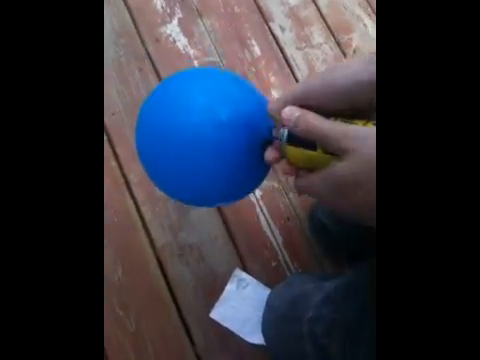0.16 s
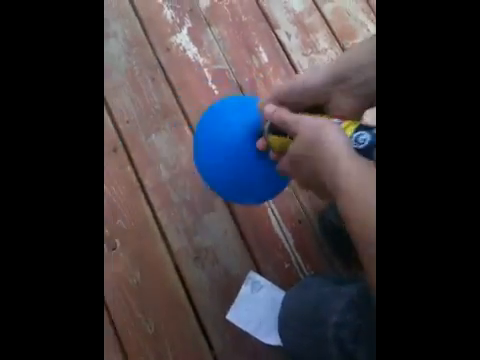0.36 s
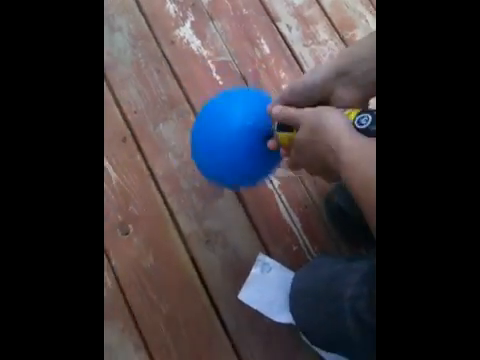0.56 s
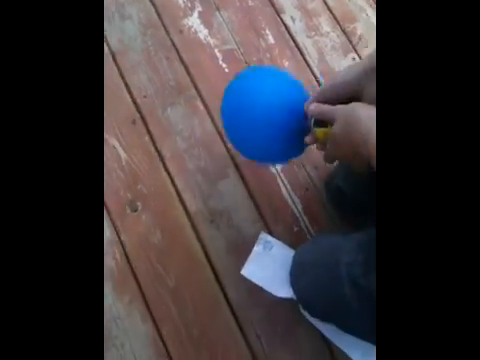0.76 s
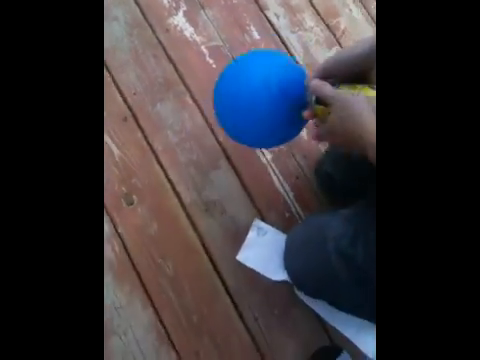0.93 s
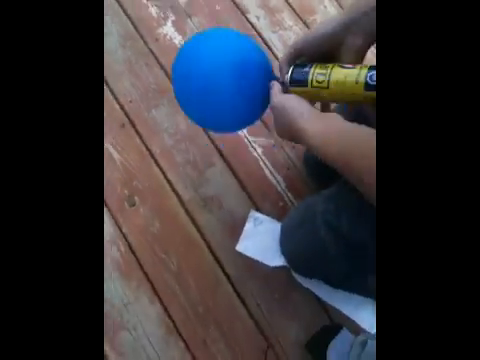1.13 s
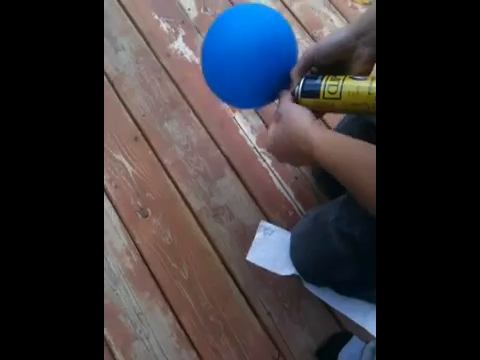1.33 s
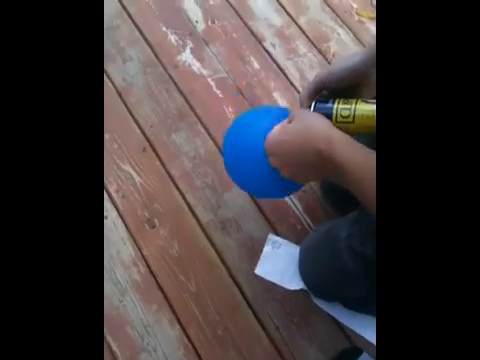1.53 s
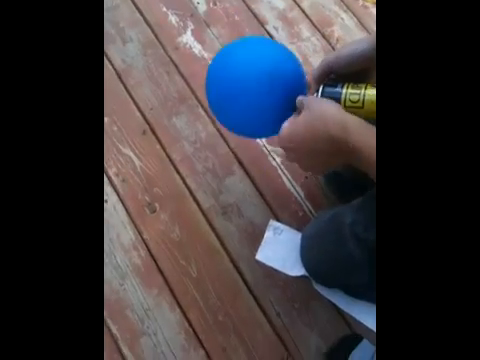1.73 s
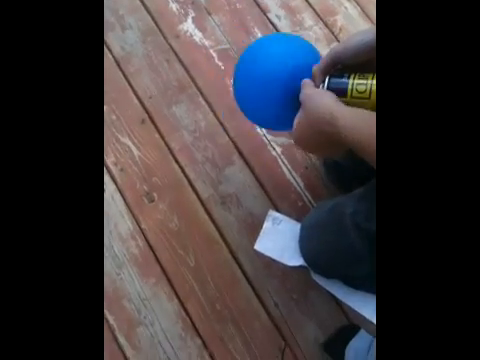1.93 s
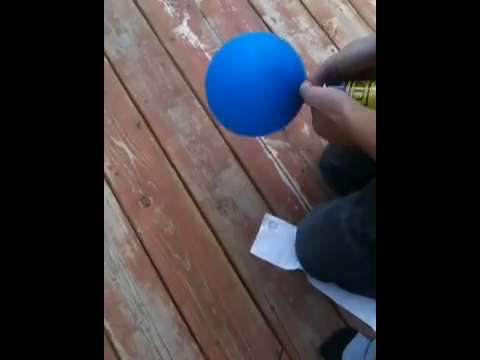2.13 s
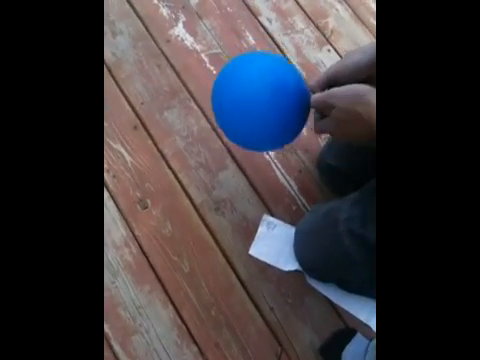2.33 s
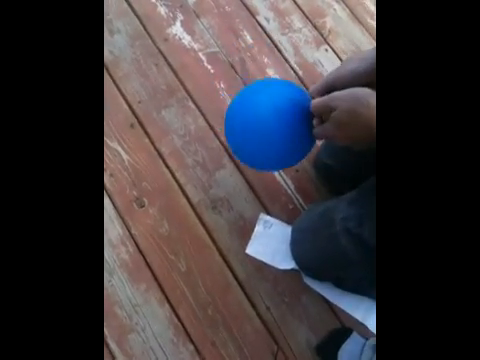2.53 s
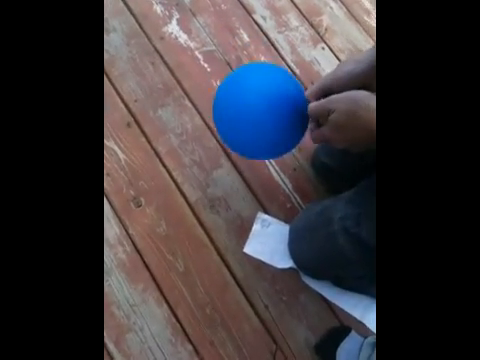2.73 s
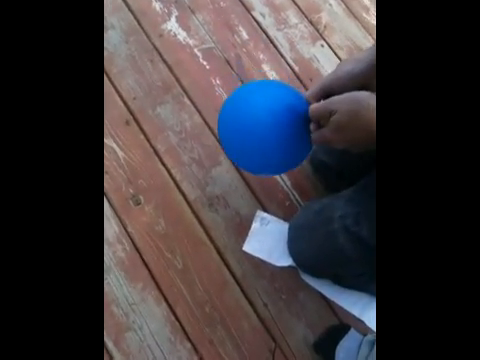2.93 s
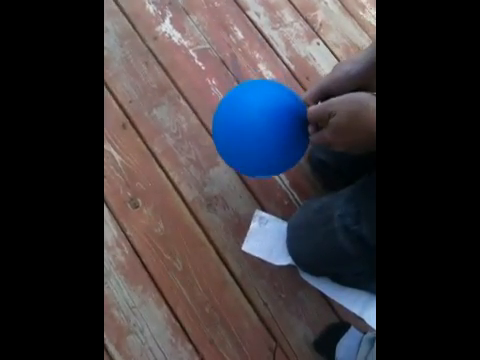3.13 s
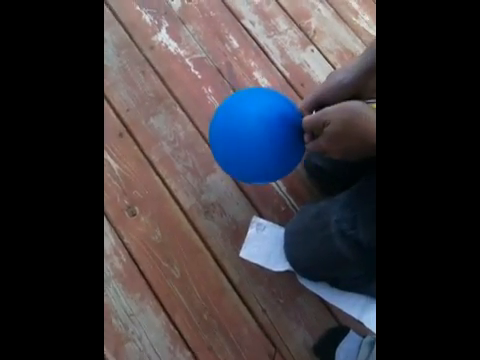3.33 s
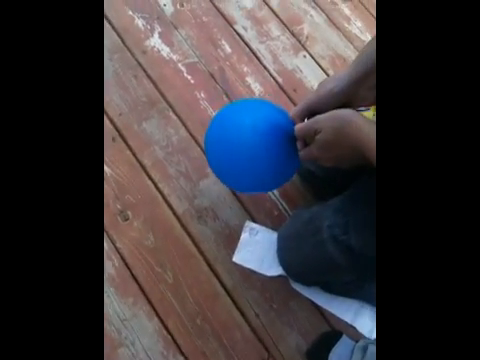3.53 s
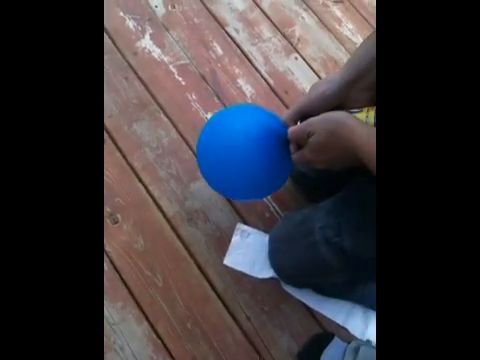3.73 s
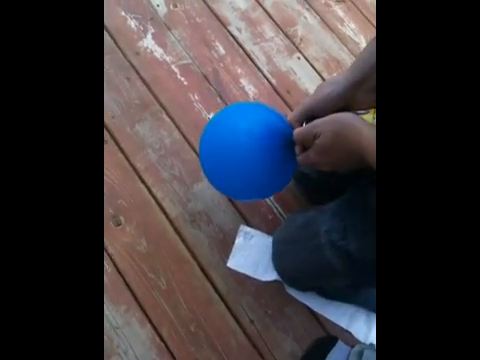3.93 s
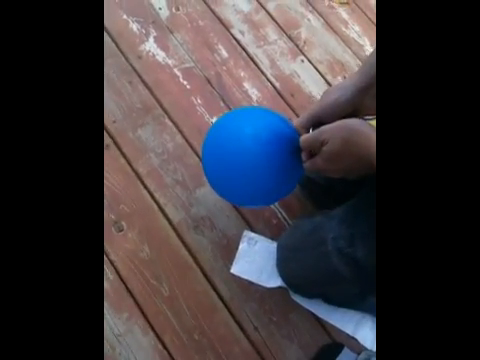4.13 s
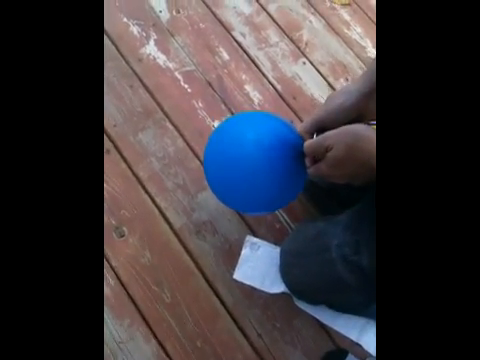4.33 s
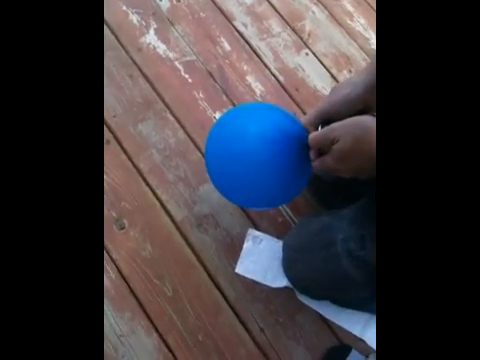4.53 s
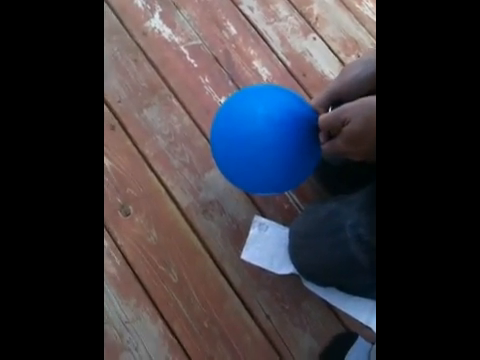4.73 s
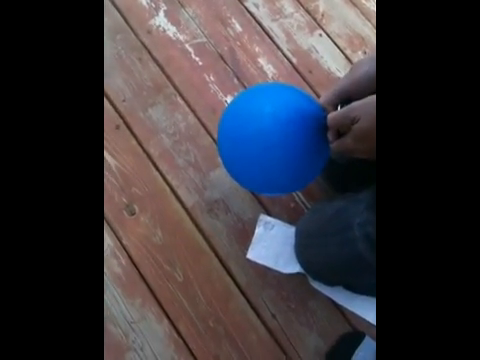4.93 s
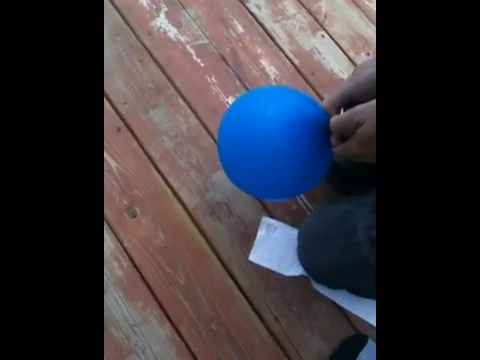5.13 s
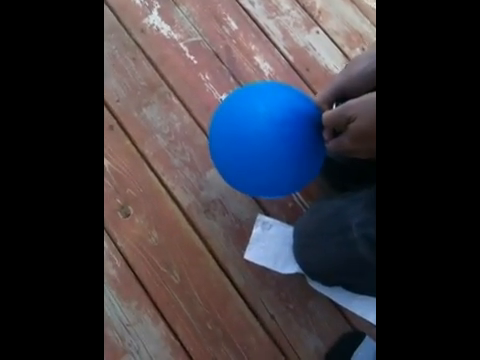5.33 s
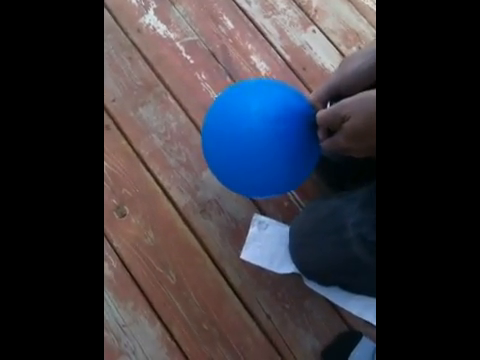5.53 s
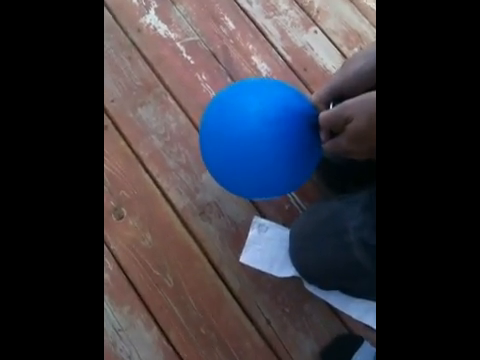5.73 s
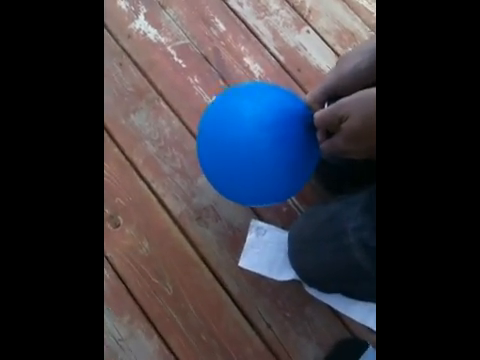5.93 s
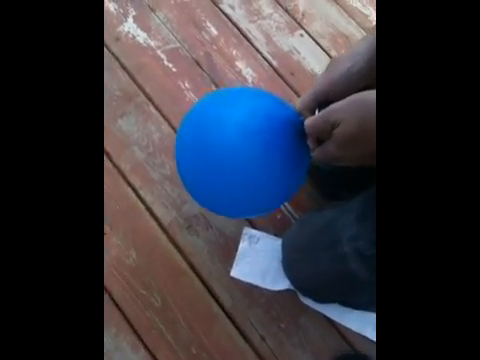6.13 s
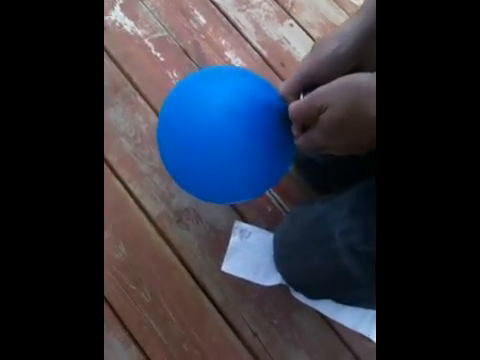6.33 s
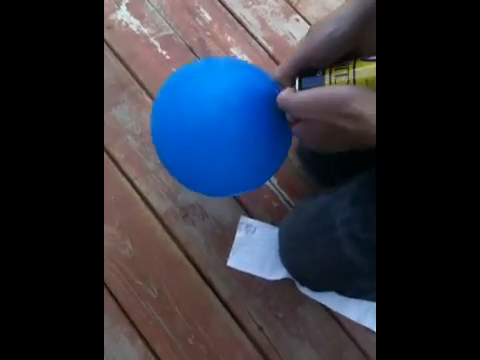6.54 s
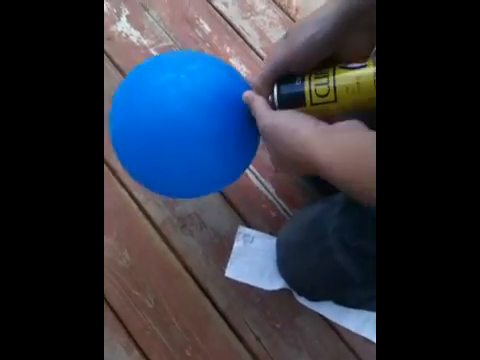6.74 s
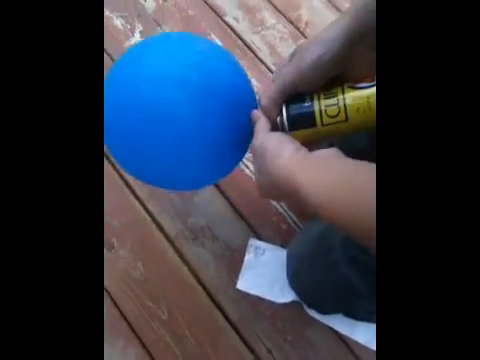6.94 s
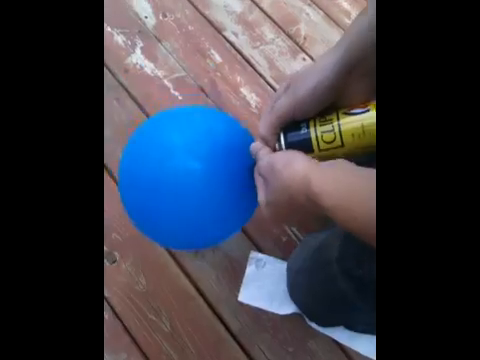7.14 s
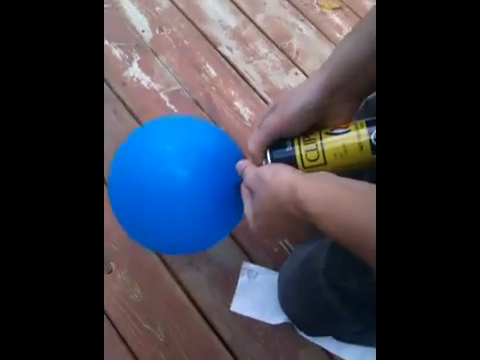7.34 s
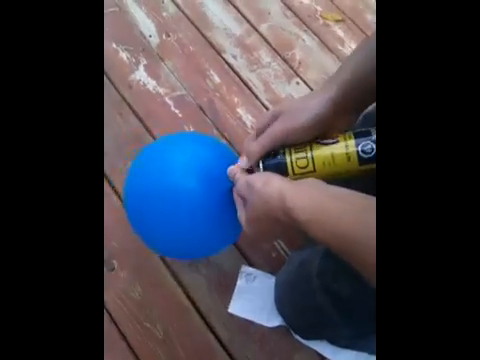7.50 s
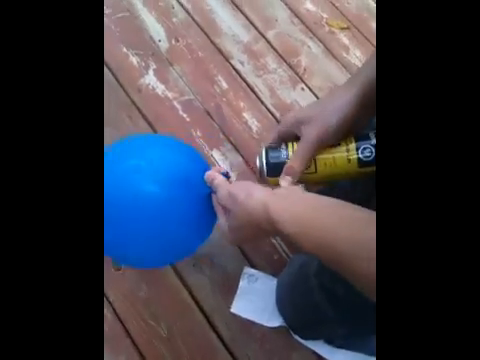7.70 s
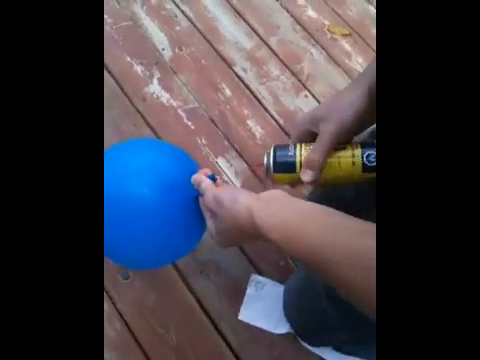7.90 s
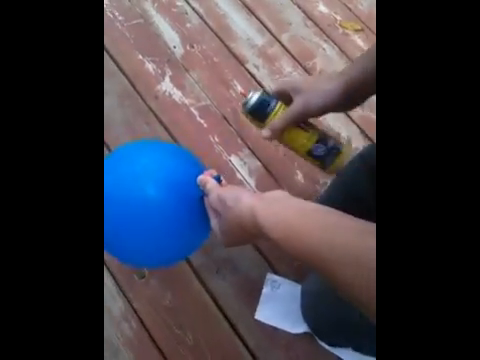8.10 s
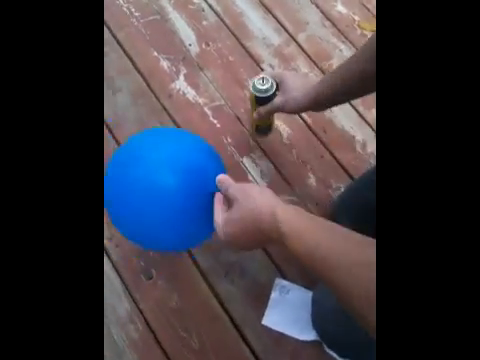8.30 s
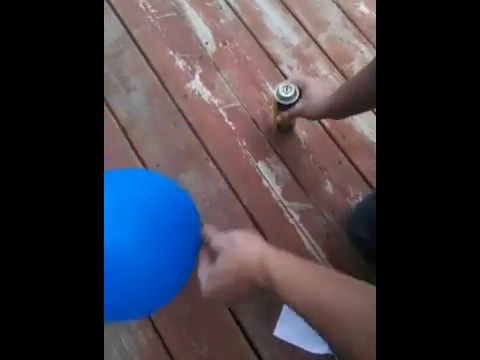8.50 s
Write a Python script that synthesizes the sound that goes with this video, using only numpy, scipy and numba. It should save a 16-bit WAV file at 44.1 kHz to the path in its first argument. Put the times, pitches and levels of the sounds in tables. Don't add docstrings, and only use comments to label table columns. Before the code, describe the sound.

One near microphone, effectively mono, catches hands filling a rubber balloon from a pressurised can. Small breathy spurts and a sharp snap come first, then light knocks and finger rubs. A strong airy hiss builds for several seconds, with hollow tones sliding slightly downward, then fades quickly. Dry rubber clicks and soft rustle follow over low, faraway traffic.

```python
import sys
import numpy as np
from scipy import signal
from scipy.fft import rfft, irfft
from scipy.io import wavfile
from scipy.ndimage import uniform_filter1d, minimum_filter1d, map_coordinates
from numba import njit

SR = 44100
rng = np.random.default_rng(int(sys.argv[2]) if len(sys.argv) > 2 else 0)


def invert_db(level):
    return 10 ** (np.asarray(level, dtype=float) / 20)


def bounce(signal):
    frames = np.transpose(np.atleast_2d(signal))
    limited = np.clip(frames, -1, 1)
    pcm = np.round(limited * 32767).astype(np.int16)
    wavfile.write(sys.argv[1], SR, pcm)


N = 382080
T = np.arange(N) / SR

# f/Hz, level/dB per Hz
JET = [(180, -48), (300, -22.5), (877, -18.5), (1070, -17.5), (1220, -18.5), (1810, -15.5), (2440, -7.5),
       (3510, -9.5), (4880, -8), (5480, -6.5), (6460, -10), (9600, 0), (11100, -3), (14500, 4.5),
       (15500, 6.5)]
BAND_EDGES_HZ = (3500, 7000, 11500)
# t/s, level/dB
SEEP = [(0, -45), (.42, -49), (.56, -50.5), (.68, -55), (.76, -51), (.97, -51.5), (1.04, -71), (1.1, -90)]
# t/s, level/dB
STREAM = [(2.24, -87), (2.262, -61.5), (2.31, -55.5), (2.37, -46), (2.6, -44.5), (3.0, -42), (3.3, -39),
          (3.65, -36.5), (4.05, -32), (4.45, -30), (4.85, -29.5), (5.2, -30.5), (5.7, -31.5), (6.1, -33.5),
          (6.5, -35.5), (6.62, -40.5), (6.67, -47), (6.84, -82)]
# peak t/s, level/dB, rise/s, fall/s, share of neck whistle/1
PUFFS = [
    (.07, -39, .2, 0.05, 0.2),
    (.49, -46, 0.048, 0.029, .9),
    (.718, -43.5, 0.011, 0.019, .02),
    (.815, -50, 0.027, 0.022, 1.2),
    (2.74, -44.5, 0.064, 0.023, 0.2),
    (6.73, -49, 0.048, 0.039, 0.5),
]
# seeping level/dB,
# its slope/dB per dB of flow, streaming level/dB, its slope/dB per dB of flow, swelling/dB per s
BANDS = [(-10.5, -0.24, -10.5, -.1, 0), (-6.5, 0.04, -7, -0.33, 0.02), (-12, 0, -7.5, -0.32, 0.6)]
FLOW_REF_DB, SWELL_REF_S = -36, 4.5
# t/s, f/Hz
LADDER = [(0, 440), (2.3, 445), (3.8, 424), (4.7, 411), (6.3, 386), (8.66, 380)]
# strongest t/s, lasting/s, f/Hz at that moment, boost level/dB
RINGS = [(2.6, 0.2, 9800, 10), (3.45, 0.23, 4400, 6), (3.58, 0.25, 5600, 8), (3.73, .35, 9300, 3),
         (3.94, .2, 8700, 6), (3.86, 0.11, 3380, 7), (4, 0.25, 4100, 7), (4.35, 0.25, 8000, 9.5),
         (4.2, 0.19, 5800, 8), (5, .55, 9500, 9), (5.1, .25, 5500, 8), (4.95, 0.37, 7100, 7.5),
         (5.16, 0.27, 7500, 8), (5.45, 0.55, 5680, 6), (5.05, .3, 14050, 10), (5.72, .3, 10400, 8),
         (5.8, 0.26, 9900, 9)]
RING_WIDTH_HZ, RING_WIDTH_SHARE = 56, 0.0082
# f/Hz when tightest, width/Hz, boost level/dB, share of ladder's slide/1
WALL = [(664, 210, 1, .9), (1250, 120, 6.5, .9), (1640, 87, 1.5, 0.73), (2453, 76, 8.5, 0.82),
        (2870, 130, 8, .15)]
TIGHTEST_S, TIGHT_FOR_S = 4.98, 1.11
# f/Hz, width/Hz, boost level/dB
SLACK = [(2870, 250, 10.5), (9200, 490, 6)]
FLUTTER_DB = 0.8
# lag/ms, wander/ms, gain/1
ECHOES = [(0.622, 0.067, 0.12), (1.052, 0.072, 0.12), (1.7, 0.076, 0.16), (3.3, 0.076, 0.33),
          (5.1, 0.12, 0.23), (7.3, 0.089, 0.2)]
# t/s, level/dB
LEAK = [(6.75, -76), (6.95, -79), (7.15, -71), (7.42, -70), (7.5, -86)]
# t/s, peak level/dB, ring f/Hz, bright part level/dB, neck level/dB
SNAPS = [(0.5134, -38, 2890, 3, -9), (0.9039, -18.5, 2670, -18, -8), (1.507, -55, 6420, 3, -1),
         (1.512, -56, 5000, 3, -1), (1.5559, -53, 3620, -23, -1), (1.779, -45, 2400, -30, -3),
         (7.543, -41.5, 3070, -13, -15), (7.5544, -50, 2870, -2, -11), (7.5832, -32, 2960, -6, -18),
         (7.5964, -49, 3570, -16, -9), (7.6405, -56, 9500, 3, -9), (7.7318, -34, 2820, -8, 2),
         (7.7478, -33.5, 6000, 3, 0.5), (7.7614, -49, 6000, -10, -9), (8.31, -48, 5790, -3.5, -6),
         (8.5445, -53, 2160, -26, -11)]
# f/Hz, width/Hz, level/dB
NECK = [(2600, 260, -21), (3030, 260, 3), (3780, 270, 3), (4400, 620, -1), (5370, 770, -3),
        (7600, 800, -14), (11700, 2400, -5), (1500, 520, -8)]
SNAP_T60_S = 0.014
# t/s, rustle level/dB
GRIP = [(1.0, -61), (1.7, -62.5), (2.1, -66.5), (6.8, -61), (7.7, -64), (7.9, -69), (8.66, -67)]
GRIP_TREBLE_DB = -0.5
# middle t/s, rustle level/dB, length/s, treble level/dB against it
RUBS = [(1.172, -56, 0.036, -6), (1.295, -58.5, 0.02, -4), (1.797, -57, 0.018, -13),
        (2.18, -61, 0.042, -12), (7.04, -68.5, 0.035, 3), (7.14, -66, 0.018, 6), (7.36, -69.5, 0.098, 3),
        (2.125, -70, 0.0092, 8), (7.533, -67, 0.028, -8), (7.605, -62, .02, 1), (7.766, -66.5, 0.03, 11),
        (8.433, -74, 0.025, 7), (8.55, -69, 0.045, -8)]
# f/Hz, level/dB per Hz
RUSTLE_COLOUR = [(500, 1), (1500, 0), (2800, 1.5), (4000, -4), (6000, -6.5), (16000, -10)]
# t/s, peak level/dB, f/Hz, length/s
KNOCKS = [(1.165, -53, 553, 0.018), (1.251, -49.5, 650, .04), (1.408, -54, 600, .02),
          (1.777, -43, 220, 0.018), (2.116, -57, 404, .04), (2.19, -44.5, 228, 0.038),
          (1.776, -47, 900, .008), (5.482, -38, 710, 0.044), (5.498, -40.5, 880, 0.043),
          (5.521, -42.5, 654, 0.047), (6.065, -45, 700, .07), (6.308, -43, 700, 0.038),
          (6.636, -46, 810, 0.016), (6.669, -47, 470, 0.021), (7., -49, 250, 0.046),
          (7.136, -55, 1100, .02), (7.582, -52, 1500, .012), (2.19, -53, 650, .04), (7.27, -55, 650, .05)]
# f/Hz, level/dB per Hz
TOWN = [(15, -42), (45, -34), (102, -14), (126, -11), (157, -2), (189, -4), (255, -5), (425, -15),
        (461, -12.5), (637, -14), (1090, -18), (1680, -22.5), (1930, -23.5), (2890, -30.5), (15800, -40.5)]
TOWN_DB = -57.5
# t/s, swell level/dB
SWELL = [(0, 0), (1.2, 0), (2.6, -0.5), (4, -1), (5.5, 1.5), (7, 1.5), (7.8, -1), (8.66, 0.5)]
# t/s, f/Hz, width/Hz, level/dB
SLIPS = [(.25, 15000, 1200, -64), (2.385, 9500, 1200, -50), (2.805, 7000, 1200, -55),
         (2.99, 8000, 3000, -46), (3.105, 5700, 1200, -49), (3.362, 5000, 1200, -47),
         (3.52, 11600, 1200, -46), (3.59, 7500, 1200, -49), (3.59, 12300, 1200, -50),
         (4.035, 5700, 1200, -46), (5.033, 7600, 1200, -38)]
TOP_HZ = 15750


def gas():
    shapes = [bell(s, np.where(T < s, rise, fall)) for s, _, rise, fall, _ in PUFFS]
    puffs = sum(invert_db(2 * row[1]) * shape ** 2 for row, shape in zip(PUFFS, shapes))
    streaming = T > STREAM[0][0]
    steady_db = np.where(streaming, track(STREAM), track(SEEP))
    jet_db = 10 * np.log10(invert_db(2 * steady_db) + puffs)

    step = track(LADDER)
    back = np.clip(0.26 + 0.0088 * (jet_db + 21) + 0.084 * walk(3.0), 0, 0.8)
    hiss = cavity(rng.standard_normal(N), SR / step, back, 0.09)
    hiss = nearby(hiss)
    for hz, width, db, slide in WALL:
        wall_hz = hz * (step / step[int(TIGHTEST_S * SR)]) ** slide
        hiss = ring(hiss, bell(TIGHTEST_S, TIGHT_FOR_S), wall_hz, width, db)
    whistle = np.array(PUFFS)[:, 4] @ shapes
    for hz, width, db in SLACK:
        hiss = ring(hiss, whistle, hz + 0 * T, width, db)
    for s, lasting, hz, db in RINGS:
        ring_hz = hz * step / step[int(s * SR)]
        hiss = ring(hiss, bell(s, lasting), ring_hz, RING_WIDTH_HZ + RING_WIDTH_SHARE * hz, db)

    flow_db = jet_db - FLOW_REF_DB
    band_db = []
    for seep_db, seep_per_db, stream_db, per_db, per_s in BANDS:
        stream_part = stream_db + per_db * flow_db + per_s * (T - SWELL_REF_S)
        band_db.append(np.where(streaming, stream_part, seep_db + seep_per_db * flow_db))
    band_db.insert(2, 0)
    edges = (0., *BAND_EDGES_HZ, 1e6)
    sputter = 0.5 * walk(25.02)
    out = 0
    for k, db in enumerate(band_db):
        part = coloured(JET, edges[k], edges[k + 1], hiss)
        part = part / np.sqrt(uniform_filter1d(part ** 2, SR // 2))
        out = out + part * invert_db(jet_db + db + sputter + 0.5 * walk(15))

    body = coloured([(20, 0), (20000, 0)], 0., 1660.0, out)
    body_db = np.where(streaming, np.clip(0.89 * (T - 4.6), -6, 3), 1.5)
    return out + body * (invert_db(body_db) - 1)


@njit
def cavity(x, lag, back, damp):
    y, soft = x.copy(), 0.
    for i in range(400, len(x)):
        k = int(lag[i])
        part = lag[i] - k
        returned = (1 - part) * y[i - k] + part * y[i - k - 1]
        soft += (1 - damp) * (returned - soft)
        y[i] += back[i] * soft
    return y


def nearby(x):
    treble, out = coloured([(20, 0), (20000, 0)], 2880.0, x=x), x.copy()
    for lag_ms, wander_ms, gain in ECHOES:
        drifting_ms = lag_ms * (1 + 0.0253 * (T - 5)) + wander_ms * walk(1.52)
        lag = drifting_ms * SR / 1000
        out += gain * walk(5.5) * map_coordinates(treble, [np.arange(N) - lag], order=2)
    return out


def ring(x, shape, hz, width, db):
    boost = invert_db((db + FLUTTER_DB * walk(6)) * shape) - 1
    return x + boost * band(x, np.minimum(hz, 0.45 * SR), 1. * width)


def leak():
    db = np.interp(T, *np.transpose(LEAK), left=-140, right=-140)
    whistle = band(rng.standard_normal(N), 2820 + 25 * walk(4.15), 70.)
    return invert_db(db + 1.5 * walk(20)) * unit(whistle)


def snaps():
    out, t = np.zeros(N + SR), T[:SR // 10]
    flapping = 0.18 * invert_db(-60 * t / 0.064)
    fade = (1 - np.exp(-t / 0.00067)) * (invert_db(-60 * t / SNAP_T60_S) + flapping)
    noises = rng.standard_normal((len(SNAPS), 3, len(t)))
    for (s, db, hz, bright_db, neck_db), noise in zip(SNAPS, noises):
        neck = sum(invert_db(g) * unit(band(noise[1], f + 0 * t, 1. * w)) for f, w, g in NECK)
        own = band(noise[0] * fade, hz + 0 * t, 530.0)
        own = band(own, hz + 0 * t, 530.0)
        blow = own / np.max(np.abs(own)) + invert_db(neck_db) * neck * fade
        sharp = unit(signal.lfilter([1, -2, 1], [1], noise[2]))
        crack = unit(band(noise[2], 9550 + 0 * t, 600.)) + 0.68 * sharp
        snap = blow / np.max(np.abs(blow)) + invert_db(bright_db) * 0.5 * crack * fade
        out[int(s * SR):][:len(t)] += invert_db(db) * snap
    return out[:N]


def rustle():
    rubs = np.array([invert_db(db) * bell(s, length) for s, db, length, _ in RUBS])
    body = invert_db(track(GRIP)) + rubs.sum(0)
    bright = invert_db(track(GRIP) + GRIP_TREBLE_DB + 2.5 * walk(12)) + invert_db(np.array(RUBS)[:, 3]) @ rubs
    grain = invert_db(1.8 * walk(60) - 5.0)
    treble = unit(coloured([(5000, 2.5), (9500, 7.5), (12000, -2), (16000, -17)], 4100.0))
    return grain * (body * unit(coloured(RUSTLE_COLOUR, 400.)) + invert_db(-5.5) * bright * treble)


def knocks():
    out, t = np.zeros(N + SR), T[:SR // 5]
    noises = rng.standard_normal((len(KNOCKS), len(t)))
    for (s, db, hz, length), noise in zip(KNOCKS, noises):
        bump = band(noise, hz + 0 * t, 0.33 * hz)
        bump = band(bump, hz + 0 * t, 0.33 * hz) * t * np.exp(-4 * t / length)
        out[int(s * SR):][:len(t)] += invert_db(db) * bump / np.max(np.abs(bump))
    return out[:N]


def town():
    whole = coloured(TOWN)
    bass = coloured([(20, 0), (20000, 0)], 0., 800.0, whole)
    swell = invert_db(track(SWELL) + 1.96 * walk(8))
    return invert_db(TOWN_DB) * unit(bass * swell + (whole - bass) * invert_db(0.42 * walk(3.24)))


def unit(x):
    return x / np.sqrt(np.mean(x ** 2))


def coloured(points, lo_hz=0., hi_hz=1e6, x=None):
    f = np.maximum(np.fft.rfftfreq(N, 1 / SR), 1)
    hz, db = np.transpose(points)
    edges = 1 / np.sqrt((1 + (lo_hz / f) ** 16) * (1 + (f / hi_hz) ** 16))
    x = rng.standard_normal(N) if x is None else x
    return irfft(rfft(x) * invert_db(np.interp(np.log(f), np.log(hz), db)) * edges, N)


def walk(rate):
    k = int(SR / rate)
    levels = np.repeat(rng.standard_normal(N // k + 1), k)
    return 1.29 * uniform_filter1d(uniform_filter1d(levels, k), k)[:N]


@njit
def band(x, hz, width):
    y, b, l = np.empty(len(x)), 0., 0.
    for i in range(len(x)):
        g, k = np.tan(np.pi * hz[i] / SR), width / hz[i]
        v = (b + g * (x[i] - l)) / (1 + g * (g + k))
        b, l, y[i] = 2 * v - b, l + 2 * g * v, k * v
    return y


def track(rows):
    return np.interp(T, *np.transpose(rows))


def bell(s, lasting):
    return np.exp(-((T - s) / lasting) ** 2 / 2)


def scene():
    mono = gas() + leak() + snaps() + rustle() + knocks() + town()
    return np.tile(mono, (2, 1))


def thin_out(x, mask_db, bass_db):
    f, _, z = signal.stft(x, SR, nperseg=2048, noverlap=1536)
    power = uniform_filter1d(uniform_filter1d(np.abs(z) ** 2, size=3, axis=1), size=3, axis=0)
    patches = rng.standard_normal((65, z.shape[1] // 4 + 1))
    patches = np.repeat(np.repeat(patches, 16, 0), 4, 1)
    mood_db = 1.9 * uniform_filter1d(patches, size=3, axis=1)
    tilt_db = 7 * (f[:, None] / TOP_HZ) ** 3
    steady = minimum_filter1d(uniform_filter1d(power, size=80, axis=0), size=7, axis=1)
    mask = steady * invert_db(2 * (mask_db + tilt_db + mood_db[:len(f), :z.shape[1]]))
    mask += power.mean(0) * invert_db(2 * (bass_db + mood_db[0, :z.shape[1]]))
    keep = 1 / (1 + (mask / (power + 1e-20)) ** 6) * (f[:, None] < TOP_HZ)
    return signal.istft(z * keep, SR, nperseg=2048, noverlap=1536)[1][:N]


def slips():
    out, t = np.zeros(N), T[:1500]
    noises = rng.standard_normal((len(SLIPS), len(t)))
    for (s, hz, width, db), noise in zip(SLIPS, noises):
        limits = [hz - width / 2, hz + width / 2]
        burst = signal.sosfilt(signal.butter(6, limits, "band", fs=SR, output="sos"), noise)
        out[int(s * SR) - 750:][:len(t)] += invert_db(db) * unit(burst) * np.hanning(len(t)) ** 0.5
    return out


def band_limit(x):
    return signal.sosfilt(signal.butter(12, 16350, fs=SR, output="sos"), x)


def record(dry):
    mid = thin_out(dry[0], mask_db=-7.5, bass_db=-32.0)
    side = slips()
    mix = np.array([mid + side, mid - side])
    return band_limit(mix)


dry = scene()
out = record(dry)
bounce(out)
```